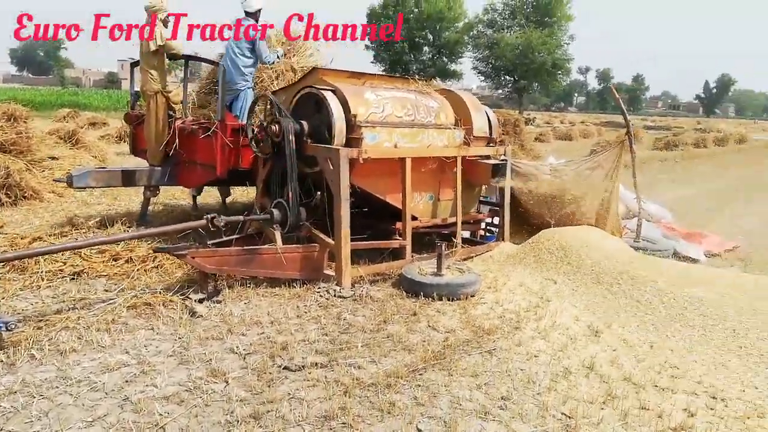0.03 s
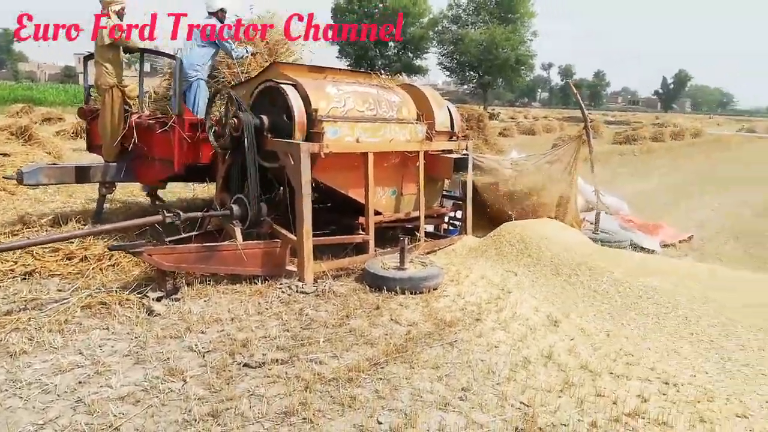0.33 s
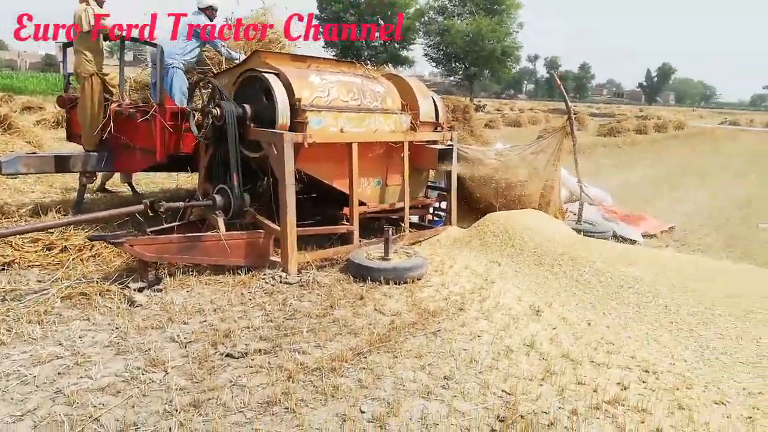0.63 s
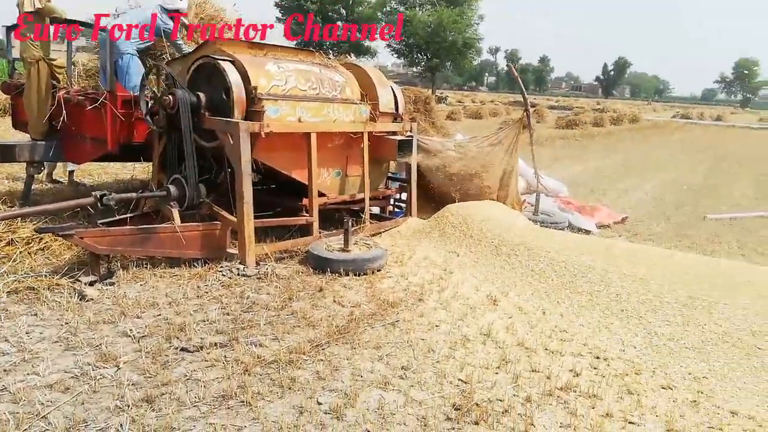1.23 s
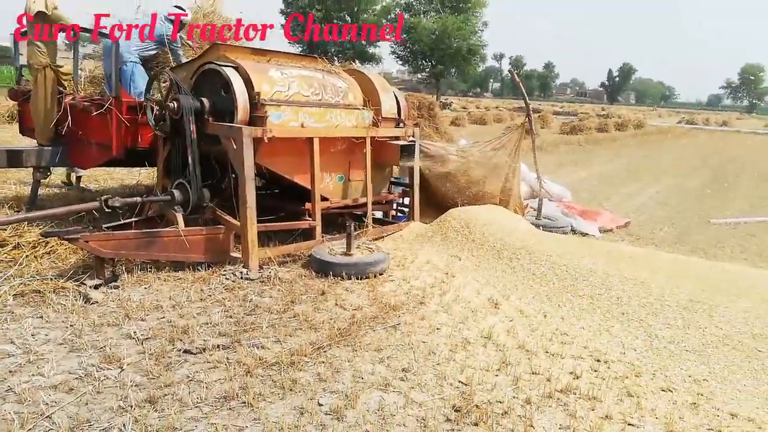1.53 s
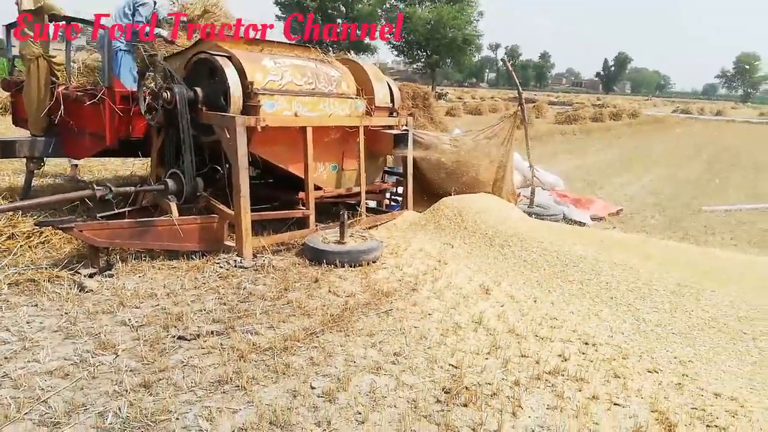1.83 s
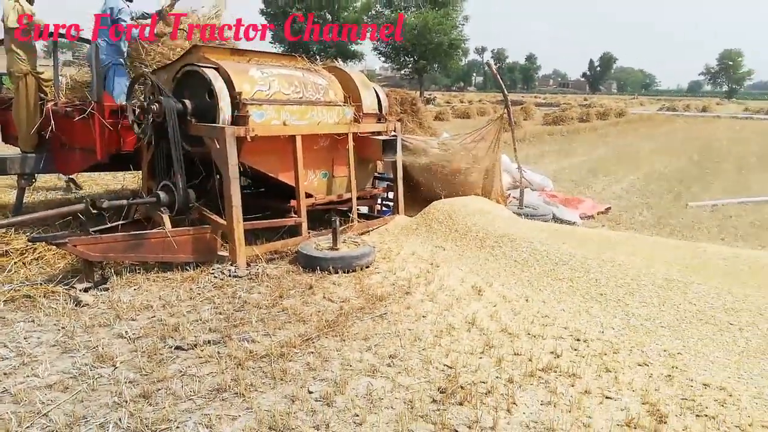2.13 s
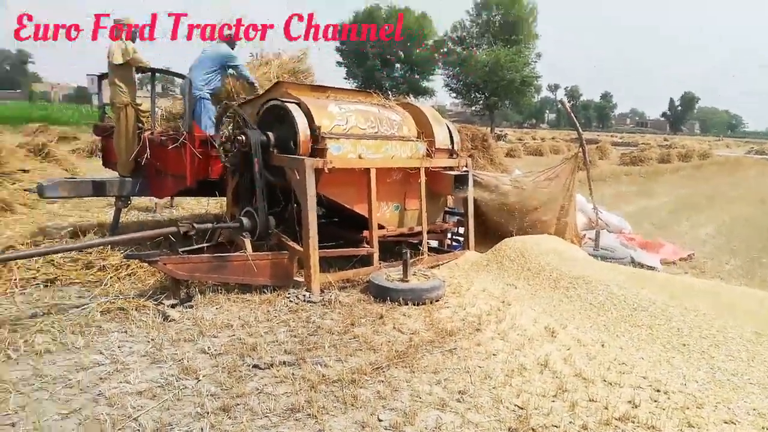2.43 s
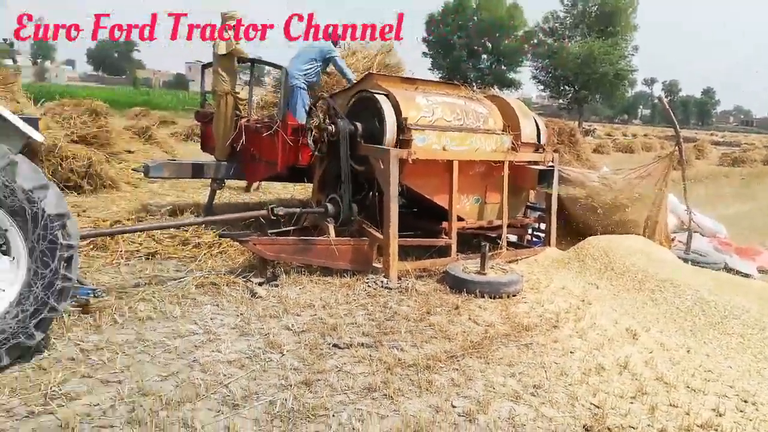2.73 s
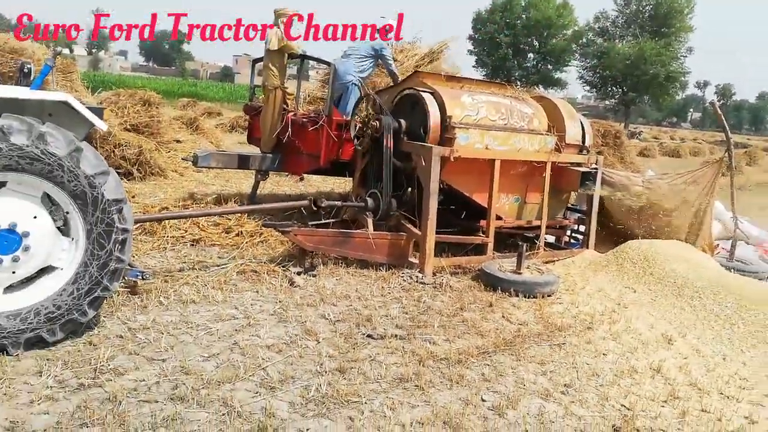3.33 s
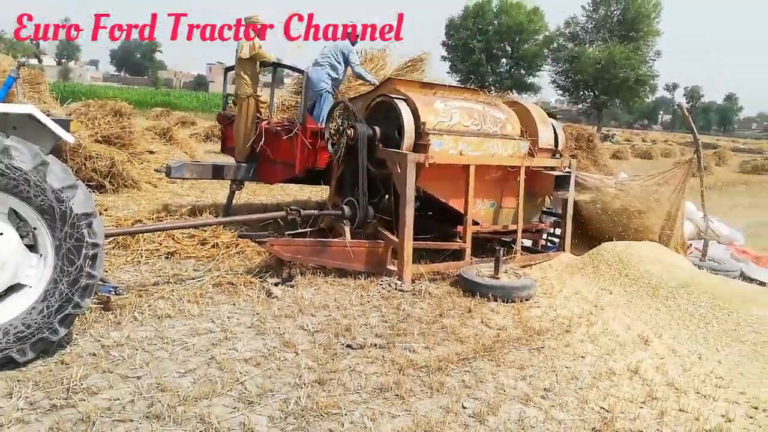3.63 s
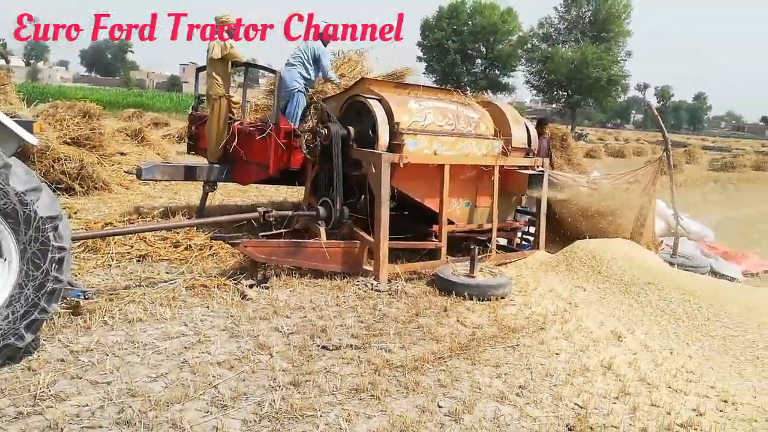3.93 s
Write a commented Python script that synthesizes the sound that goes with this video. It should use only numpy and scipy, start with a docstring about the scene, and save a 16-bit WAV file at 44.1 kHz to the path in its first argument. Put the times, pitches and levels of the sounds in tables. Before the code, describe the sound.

A thresher runs with a loud, steady roar and hum over the throb of a diesel tractor in an open field. Blown chaff hisses, with faint ticks of grain, and one brief squeal comes near the end.

```python
"""A diesel exhaust throbs under the roar and hiss of a wheat thresher running in an open field.
Periodic firings give the tractor a harmonic note, which sags a little under load. The beater drum
hums and modulates the roar in its housing; blown chaff hisses on sheet metal, with short spurts of
grain. The hiss on the right changes colour as the microphone turns. One brief squeal comes near the end."""
import sys
import numpy as np
from scipy import signal
from scipy.fft import rfft, irfft, next_fast_len
from scipy.io import wavfile
from scipy.ndimage import uniform_filter1d, map_coordinates

SR = 44100
rng = np.random.default_rng(int(sys.argv[2]) if len(sys.argv) > 2 else 0)


def int16_out(signal):
    """Quantize to a 16-bit WAV file."""
    q = np.round(np.clip(np.atleast_2d(signal).T, -1, 1) * 32767)
    wavfile.write(sys.argv[1], SR, q.astype(np.int16))


N = 176400

# Engine speed. Each row: time in seconds, firings per second.
FIRING_RATE = [(0, 58.24), (1.2, 58.42), (2.4, 58.42), (3.15, 58.52), (3.6, 57.68), (4, 57.45)]
# Exhaust note. Each row: multiple of the firing rate, level in dB.
EXHAUST_HARMONICS = [(1, -17.5), (2, -16.5), (3, -27), (4, -26.5), (5, -27), (6, -48), (8, -46.5), (9, -65),
                     (10, -38.5), (12, -45.5), (13, -46)]
# Rumble of the exhaust gas. Each row: frequency in Hz, density in dB per Hz.
RUMBLE_SPECTRUM = [(20, -84), (35, -71), (60, -51), (85, -47.5), (140, -51.5), (255, -51), (290, -57.5),
                   (315, -69), (500, -72), (900, -100)]
# Drift of the exhaust level. Each row: time in seconds, gain in dB.
EXHAUST_GAIN = [(0, -1), (1.1, -0.5), (1.8, 0.2), (2.3, -0.3), (3.2, -0.1), (3.6, -1.5), (4, -1)]

# Hum of the thresher. Each row: multiple of the drum rate, level in dB.
HUM_HARMONICS = [(3, -42), (6, -30), (13, -35), (15, -34.5), (18, -34), (24, -47), (28, -46.5), (30, -48.5),
                 (49, -44.5), (75, -43), (102, -46)]
# Modulation of the roar by uneven beaters. Each row: multiple of the drum rate, depth as a fraction.
BEATER_FLUTTER = [(3, .1), (4, .05), (5, .05), (6, .08), (8, .05)]
# Roar in the drum housing. Each row: frequency in Hz, density in dB per Hz.
ROAR_SPECTRUM = [(250, -62.5), (350, -57), (520, -60.5), (680, -57), (820, -54.5), (980, -56.5),
                 (1200, -56), (1600, -57), (2150, -58), (2700, -64), (3600, -100)]
# Stereo balance of the roar. Each row: frequency in Hz, left minus right in dB.
ROAR_LEFT_EXCESS = [(350, 2), (520, -4), (680, 2.7), (820, 1.5), (980, 2.2), (1200, -3.5), (1600, -3),
                    (2150, 1.5)]
# Likeness of the roar on left and right. Each row: frequency in Hz, coherence from 0 to 1.
ROAR_COHERENCE = [(330, 0.34), (600, 0.067), (850, 0.34), (1080, 0.77), (1350, 0.067), (1600, 0.36),
                  (2100, 0.75), (2700, 0.77)]
# Stereo phase of the roar. Each row: frequency in Hz, lead of the left in radians.
ROAR_LEFT_LEAD = [(330, 0.2), (750, -0.21), (950, -2.37), (1200, -1.76), (1500, 1), (2000, -0.087),
                  (2600, -2.3)]
# Drift of the roar level. Each row: time in seconds, gain in dB.
ROAR_GAIN = [(0, 1.36), (1.7, 1.6), (2.3, 0.8), (3.2, 1), (3.65, 0.1), (4, 1)]

# Chaff hiss on the left, and on the right before and after the microphone turns.
# Each row: frequency in Hz, density in dB per Hz.
LEFT_HISS = [(1800, -84), (2600, -62), (3500, -61), (5000, -63), (7500, -63.5), (9500, -67.2), (12000, -74),
             (15000, -79.5)]
RIGHT_HISS_BEFORE = [(1800, -109), (2600, -66.5), (3300, -66.5), (4600, -59.5), (6200, -58.6),
                     (8400, -61.5), (9400, -56), (10300, -52), (11400, -57.5), (13000, -68.5),
                     (15000, -71.8)]
RIGHT_HISS_AFTER = [(1800, -80), (2700, -66.5), (3600, -61.5), (5000, -57), (7300, -64), (8200, -60),
                    (9200, -53), (10200, -52.5), (11600, -64.5), (13800, -65), (14900, -88)]
# Flow of chaff. Each row: time in seconds, gain of the hiss in dB.
CHAFF_FLOW = [(0, -0.4), (1, -0.1), (2.1, -0.3), (2.37, .5), (2.6, -0.7), (2.9, -0.2), (3.2, 0.4),
              (3.6, 1.5), (4, 1.1)]
# Spurts of grain. Each row: start in seconds, peak change of the hiss in dB.
GRAIN_SPURTS = [(.116, 4.8), (.939, 3.3), (1.0733, 6.5), (1.558, 3.5), (1.829, 2.5), (2.041, 4.5),
                (2.125, 2), (2.684, 2.5), (3.07, -0.5), (3.607, 1)]

# Tones of the squeal. Each row: start, peak and end in seconds, first and last pitch in Hz, level in dB.
SQUEAL_TONES = [(3.815, 3.862, 3.985, 1200, 1262, -20), (3.825, 3.89, 3.955, 1200, 1060, -29.5)]


def exhaust(firings, rate, jitter_s=0.000083, waver_db=0.5, puff_depth=0.28, puff_lag_cycles=0.42):
    """Periodic excitation: each firing sends a pressure pulse and a puff of rumbling gas down the pipe."""
    uneven = firings + jitter_s * rate * wobble(35)
    note = sum(amp(db + waver_db * wobble(16)) * np.cos(2 * np.pi * k * uneven)
               for k, db in EXHAUST_HARMONICS)
    puffs = 1 + puff_depth * np.cos(2 * np.pi * (firings - puff_lag_cycles))
    rumble = coloured(puffs * rng.standard_normal(N), RUMBLE_SPECTRUM)
    return amp(curve(EXHAUST_GAIN)) * (note + rumble)


def beater_drum(turns, hum_waver_db=2.5, roar_waver_db=.3):
    """Amplitude modulation: the beaters hum at harmonics of their rotation and chop the housing's roar."""
    def harmonic(k):
        return np.cos(2 * np.pi * (k * turns + rng.random()))

    hum = sum(amp(db + hum_waver_db * wobble(4.99)) * harmonic(k) for k, db in HUM_HARMONICS)
    flutter = 1 + sum(depth * harmonic(k) for k, depth in BEATER_FLUTTER)
    roar = housing_roar(turns)
    return hum + roar * flutter * amp(curve(ROAR_GAIN) + roar_waver_db * wobble(14))


def housing_roar(turns, repeat_share=.22):
    """Partial coherence: churning air and straw make noise partly alike at each turn and on each side."""
    def mid_side_gains(hz):
        angle = np.arccos(along(ROAR_COHERENCE, hz)) / 2
        return np.array([np.cos(angle), np.sin(angle)])

    def left_right_gains(hz):
        half = np.array([[.5], [-.5]])
        return amp(half * along(ROAR_LEFT_EXCESS, hz)) * np.exp(1j * half * along(ROAR_LEFT_LEAD, hz))

    samples_per_turn = round(N / (turns[-1] - turns[0]))
    repeating = rng.standard_normal((2, 4096))[:, (turns % 1 * samples_per_turn).astype(int)]
    churn = straw_clumps(with_noise(repeating, repeat_share), depth_db=1.0)
    mid, side = filtered(churn, mid_side_gains)
    stereo = filtered(np.array([mid + side, mid - side]), left_right_gains)
    return coloured(stereo, ROAR_SPECTRUM)


def chaff_hiss(ticks_per_s=2500, tick_share=0.29, spread_db=2.5, turn_start_s=2.35, turn_end_s=2.76):
    """Shot noise: random impacts of kernels and straws on sheet metal merge into a hiss."""
    sizes = amp(spread_db * np.minimum(rng.exponential(size=(2, N)), 5))
    impacts = rng.random((2, N)) < ticks_per_s / SR
    ticks = unit(impacts * sizes * rng.choice([-1, 1], (2, N)))
    left, right = straw_clumps(with_noise(ticks, tick_share), depth_db=1.22)
    turned = curve([(turn_start_s, 0), (turn_end_s, 1)])  # progress of the microphone's turn
    right = (1 - turned) * coloured(right, RIGHT_HISS_BEFORE) + turned * coloured(right, RIGHT_HISS_AFTER)
    return np.array([coloured(left, LEFT_HISS), right])


def blower_flow(turns, surge_db=0.5, decay_turns=0.32, spurt_rise_s=0.0063, waver_db=0.3, flicker_db=.5):
    """Modulation by flow: the gain of the hiss swells with each blower turn and with spurts of grain."""
    surge = np.exp(-(turns % 1) / decay_turns)
    flow_db = curve(CHAFF_FLOW) + surge_db * (surge - surge.mean())
    for start, peak_db in GRAIN_SPURTS:
        age = np.maximum(np.arange(N) / SR - start, 0) / spurt_rise_s
        flow_db += peak_db * age * np.exp(1 - age)
    flow_db += waver_db * wobble(9.3)
    return amp(flow_db + flicker_db * np.array([wobble(55), wobble(55)]))


def straw_clumps(noise, depth_db):
    """Random filtering: clumps of straw colour the noise in short patches of time and frequency."""
    spectrogram = signal.stft(noise, nperseg=512)[2]
    patches = rng.standard_normal(spectrogram.shape[1:])
    patches = uniform_filter1d(patches, 4, axis=0)  # across frequency
    patches = uniform_filter1d(patches, 5, axis=1)  # across time
    patchy = signal.istft(spectrogram * amp(depth_db * unit(patches)), nperseg=512)[1]
    return unit(patchy[:, :N])


def squeal(fade_db=23, roughness_rad=.5):
    """Phase modulation roughens a squeal, perhaps a slipping belt: one tone lifts, a weaker one sags."""
    out = np.zeros((2, N))
    for start, peak, end, start_hz, end_hz, db in SQUEAL_TONES:
        hz = curve([(start, start_hz), (end, end_hz)])
        fade = curve([(start, 1), (peak, 0), (end, 1)])
        phase = 2 * np.pi * np.cumsum(hz) / SR + roughness_rad * np.array([wobble(180), wobble(180)])
        out += np.sqrt(2) * (fade < 1) * amp(db - fade_db * fade) * np.sin(phase)
    return out


def amp(db):
    """Decibels as an amplitude ratio."""
    return 10 ** (np.asarray(db) / 20)


def unit(x):
    """Normalisation to rms 1."""
    return x / np.sqrt(np.mean(x ** 2) + 1e-20)


def along(points, hz):
    """Interpolation of (Hz, value) points on a logarithmic frequency axis."""
    freqs, values = np.transpose(points)
    return np.interp(np.log(hz + 1), np.log(freqs + 1), values)


def curve(points):
    """Linear interpolation of (seconds, value) points at every sample."""
    times, values = np.transpose(points)
    return np.interp(np.arange(N) / SR, times, values)


def wobble(knots_per_s):
    """Spline interpolation of random knots: a smooth fluctuation."""
    knots = rng.standard_normal(4096)
    return map_coordinates(knots, [np.arange(N) * knots_per_s / SR], mode="wrap")


def with_noise(x, share):
    """Independent signals add in power: x supplies the given share, white stereo noise the rest."""
    return np.sqrt(share) * x + np.sqrt(1 - share) * rng.standard_normal((2, N))


def filtered(x, response):
    """Linear filtering: the spectrum of x is multiplied by a frequency response."""
    size = next_fast_len(N + SR // 2)
    return irfft(rfft(x, size) * response(np.fft.rfftfreq(size, 1 / SR)), size)[..., :N]


def coloured(white, spectrum):
    """Spectral shaping: white noise of rms 1 takes on a density in dB per Hz."""
    return filtered(white, lambda hz: amp(along(spectrum, hz)) * np.sqrt(SR / 2))


def scene(first_firing_s=.0081, left_lead_s=.00008, drum_per_firing=.265, blower_per_firing=.2495):
    """Mechanical coupling: one engine speed sets the exhaust and, by shaft and belts, drum and blower."""
    def from_left(hz):  # the tractor's sound reaches the left side first
        return np.exp(1j * np.pi * hz * left_lead_s * np.array([[1], [-1]]))

    rate = curve(FIRING_RATE)
    firings = np.cumsum(rate) / SR - first_firing_s * rate[0]
    tractor = filtered(exhaust(firings, rate), from_left)
    drum = beater_drum(drum_per_firing * firings)
    chaff = chaff_hiss() * blower_flow(blower_per_firing * firings)
    return tractor + drum + chaff + squeal()


def record(dry, low_cut_hz=23.7, ceiling=.88, top_hz=15400):
    """Band limiting and soft saturation: the deepest bass and top treble go, and high peaks round off."""
    x = signal.sosfilt(signal.butter(2, low_cut_hz, "high", fs=SR, output="sos"), dry)
    x = x / (1 + np.abs(x / ceiling) ** 8) ** (1 / 8)
    return filtered(x, lambda hz: hz < top_hz)


dry = scene()
out = record(dry)
int16_out(out)
```